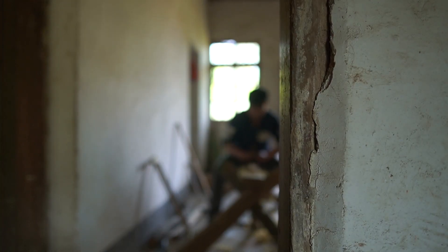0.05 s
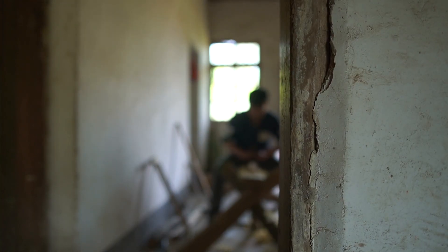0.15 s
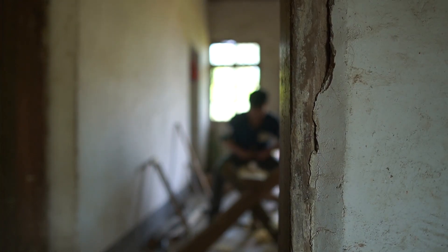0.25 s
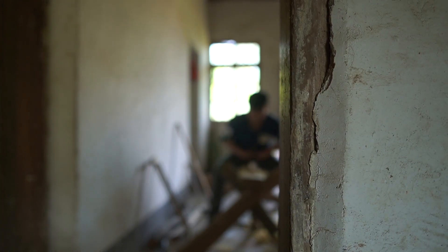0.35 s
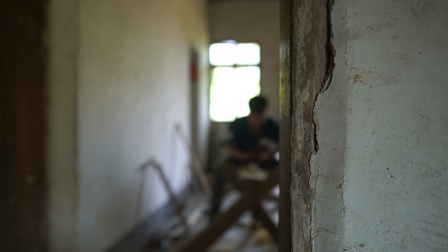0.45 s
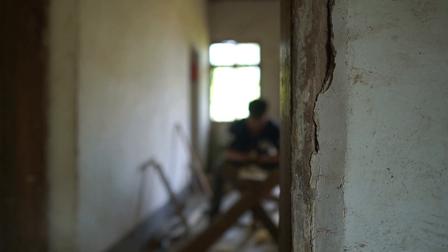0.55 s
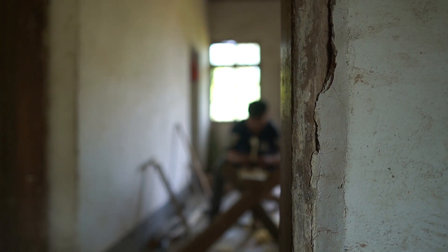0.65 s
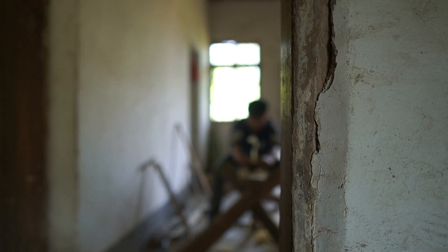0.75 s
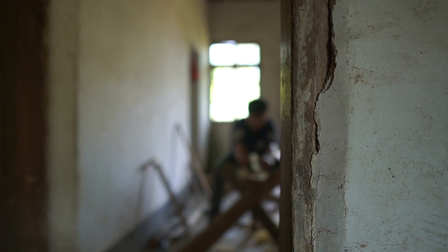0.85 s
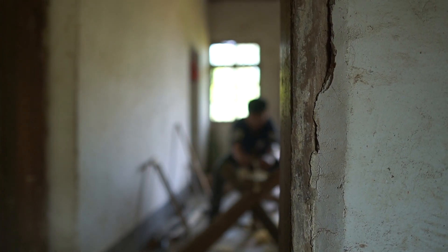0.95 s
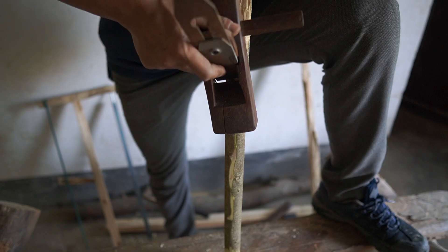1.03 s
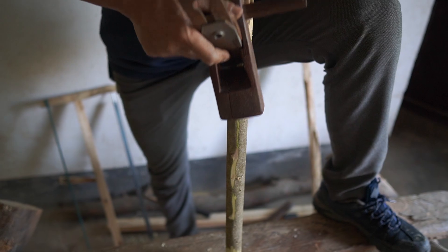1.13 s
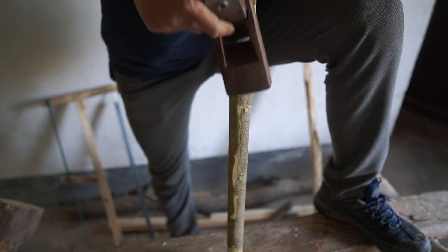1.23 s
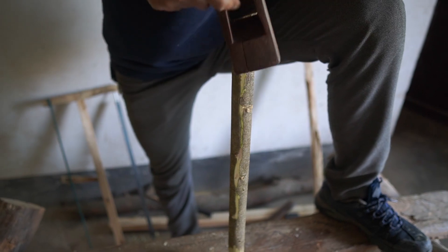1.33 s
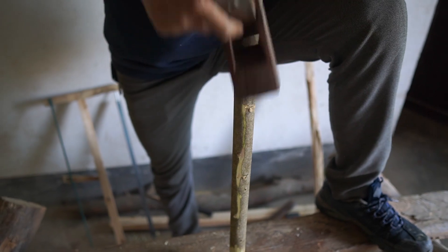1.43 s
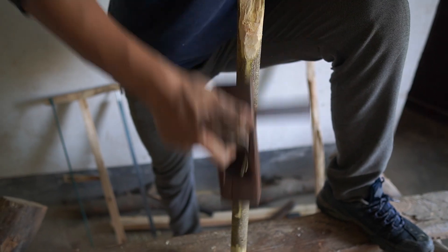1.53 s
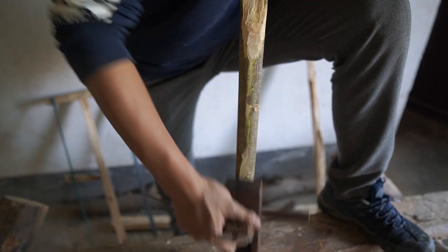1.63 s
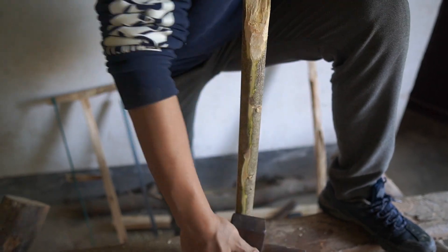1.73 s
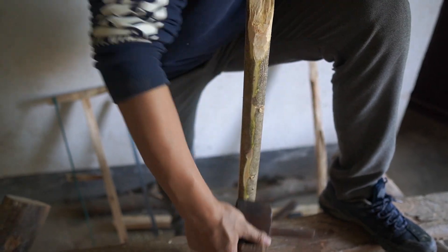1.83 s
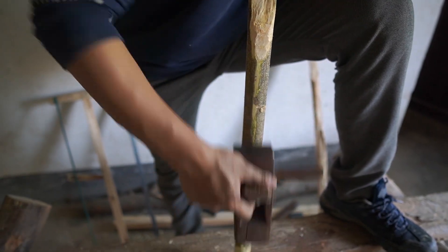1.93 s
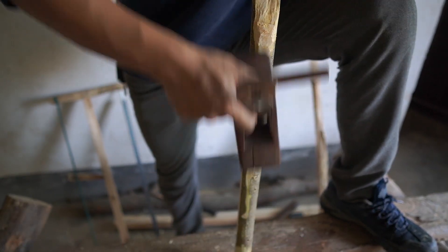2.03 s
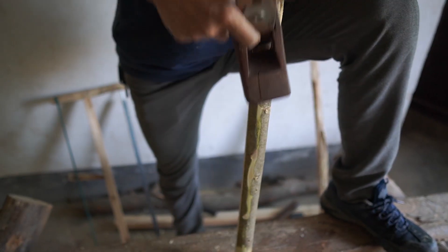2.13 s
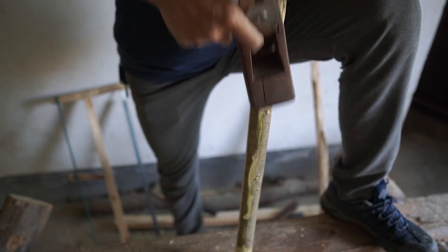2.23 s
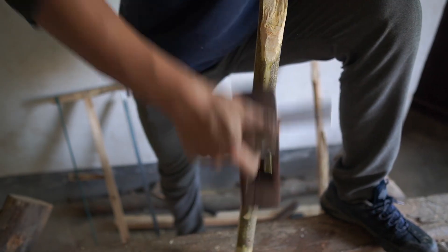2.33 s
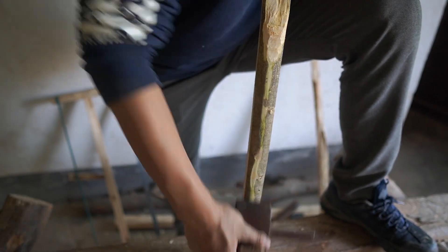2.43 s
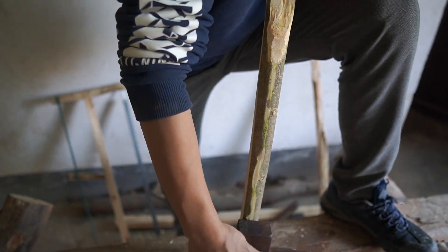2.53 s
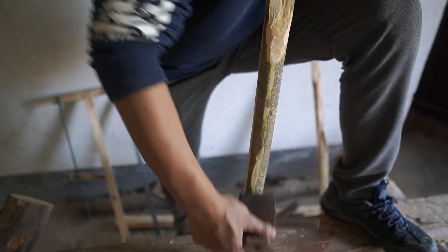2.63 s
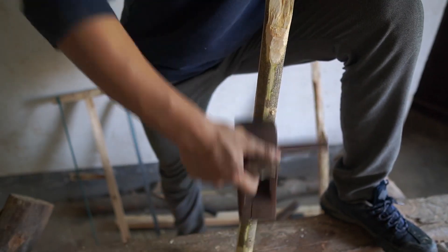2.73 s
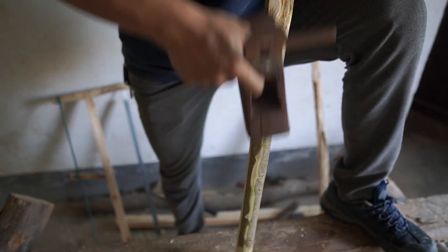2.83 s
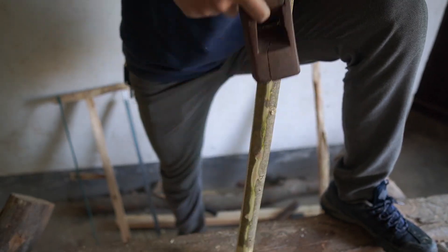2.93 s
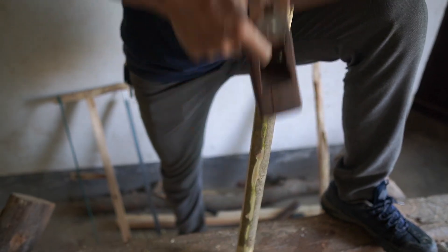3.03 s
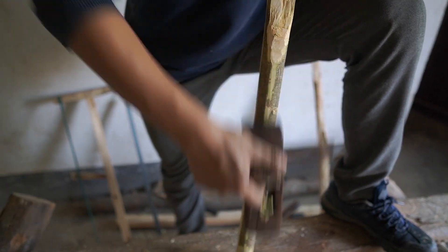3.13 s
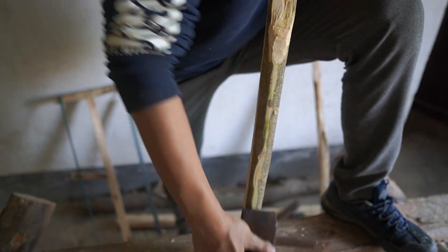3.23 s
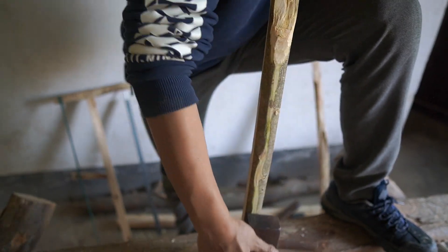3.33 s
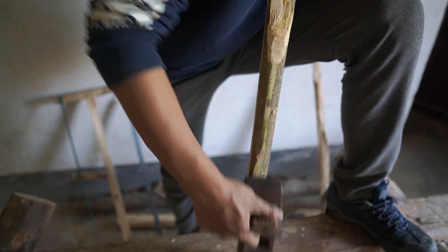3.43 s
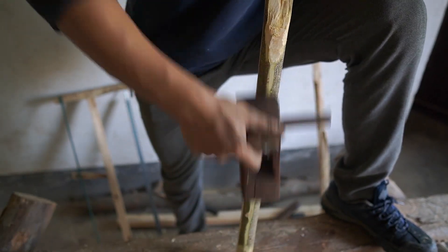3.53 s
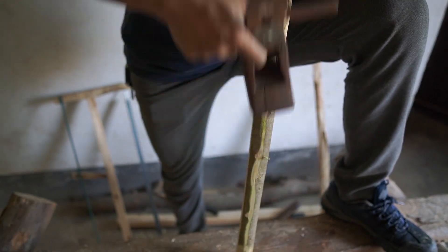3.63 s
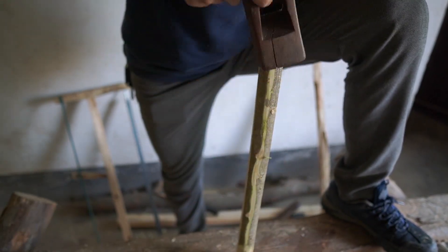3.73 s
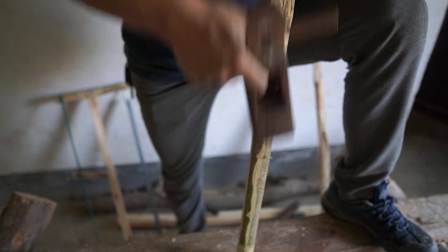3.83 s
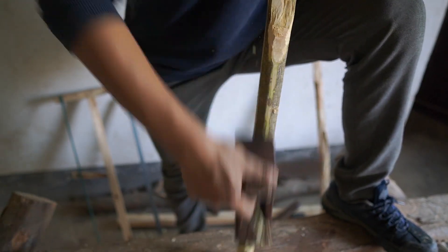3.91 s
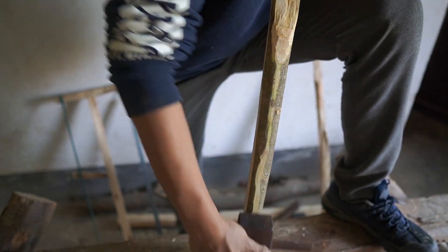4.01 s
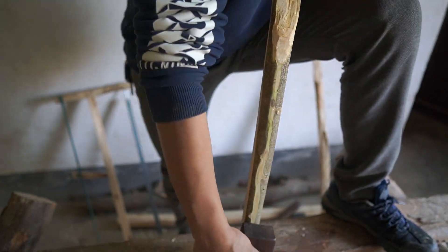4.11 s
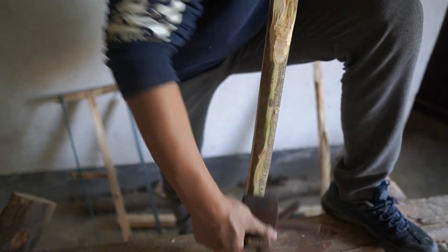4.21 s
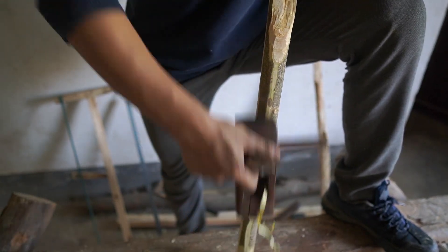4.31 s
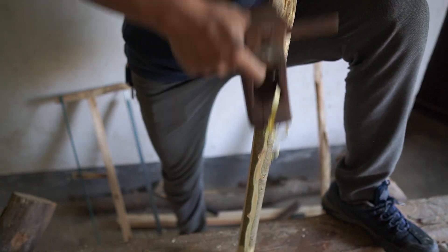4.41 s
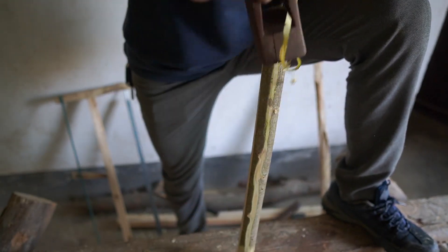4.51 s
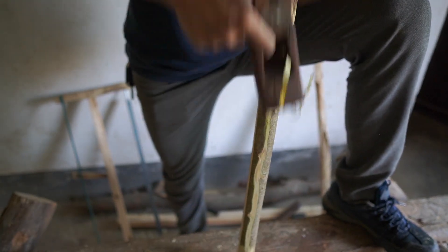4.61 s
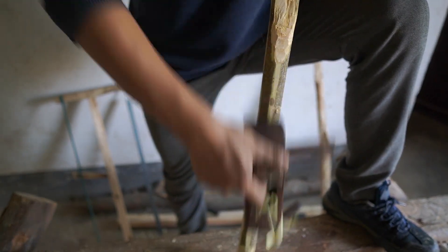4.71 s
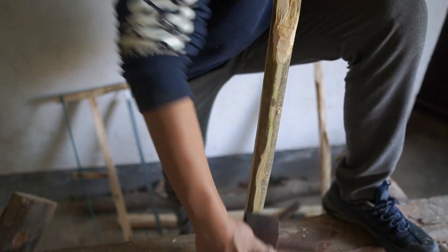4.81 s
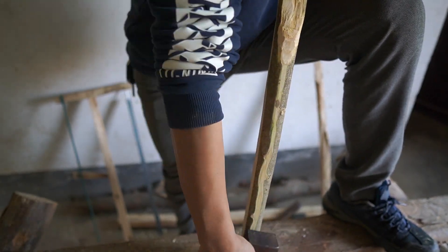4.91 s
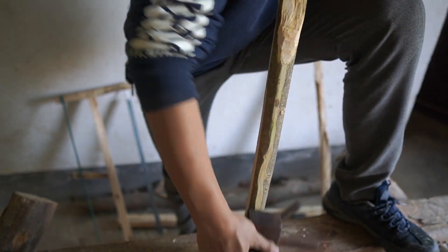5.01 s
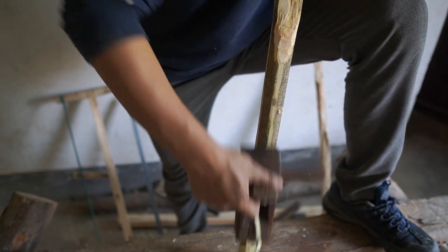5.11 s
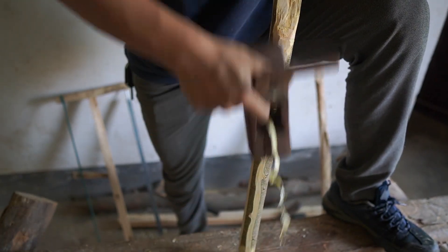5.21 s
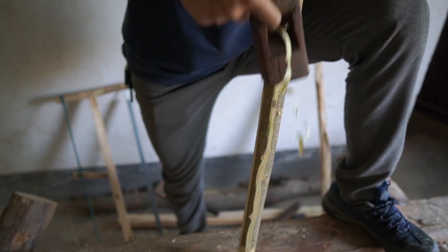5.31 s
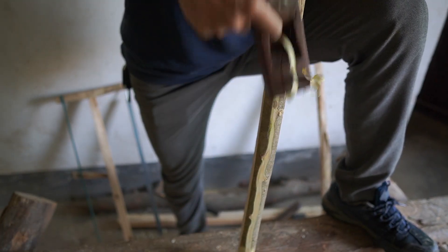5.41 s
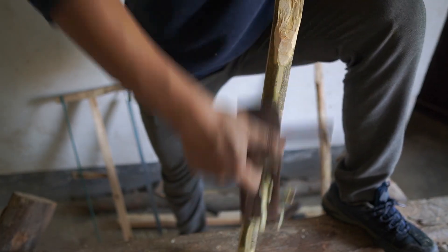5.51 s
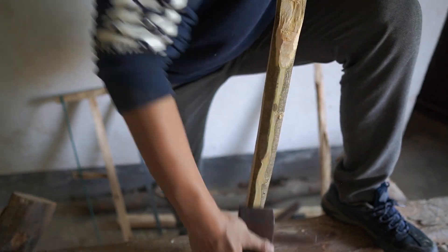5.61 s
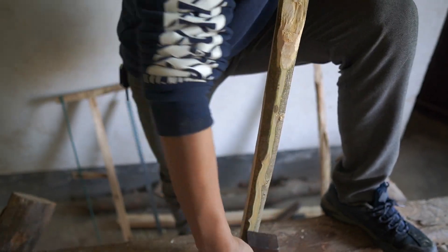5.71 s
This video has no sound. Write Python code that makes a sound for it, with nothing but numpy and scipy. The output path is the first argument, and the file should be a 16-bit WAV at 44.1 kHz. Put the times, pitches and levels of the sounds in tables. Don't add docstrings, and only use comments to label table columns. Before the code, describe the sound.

A wooden hand plane works along a green pole on a trestle in a bare, lightly echoing room. For the first 1.1 seconds it is heard from the doorway: a fading drag, faint rubs near 0.2 and 0.5, then a hard woody rasp at about 0.75 with a low ring after it. The sound cuts to close range, quiet at first. Tearing strokes of about 0.2 seconds follow at roughly 1.55, 2.35, 3.15, 3.95, 4.7 and 5.55, each a stuttering cluster of dry bites with bright steel hiss and brief squeaky resonances where grain catches. Between them come softer back-drags and wooden knocks, notably near 2.05, 2.8, 3.6, 4.4 and 4.9. The pole rumbles lightly, the trestle and floor give low muffled thuds as weight shifts, and cloth and shavings rustle faintly. It stops just after the last stroke, about 5.76 seconds.

```python
import sys
import numpy as np
from scipy import signal
from scipy.fft import rfft, irfft
from scipy.io import wavfile
from scipy.ndimage import uniform_filter1d

SR = 44100
rng = np.random.default_rng(int(sys.argv[2]) if len(sys.argv) > 2 else 0)


def unload_wav(signal):
    wavfile.write(
        sys.argv[1],
        SR,
        np.round(np.clip(np.atleast_2d(signal).T, -1, 1) * 32767).astype(np.int16),
    )


def ratio_of_db(decibels):
    return 10 ** (np.asarray(decibels, float) / 20)


N = 254016
CHANGE_S = 1.103
CHANGE = round(CHANGE_S * SR)
SIDES = np.array([[1], [-1]])

# start/s, length/s, first pressure/dB, last pressure/dB, keenness of iron/dB
BITES = [(1.549, 0.052, -24.5, -24.5, 8.5), (1.628, 0.063, -14.5, -28.5, 3.5),
         (1.676, 0.031, -37, -15.5, 5.5), (1.715, 0.05, -44, -25, -5), (2.348, 0.046, -23, -26, 8),
         (2.421, 0.036, -13.5, -23.5, 2.5), (2.459, 0.053, -22, -25.5, 5.5), (2.499, 0.018, -32, -24.5, 9),
         (3.13, 0.051, -21, -30, 10.5), (3.186, 0.051, -23.5, -19, 3), (3.236, 0.054, -32.5, -20.5, 8.5),
         (3.292, 0.027, -19, -22.5, 5), (3.934, 0.045, -22.5, -25.5, 9), (3.986, 0.039, -23, -22, 6.5),
         (4.028, 0.058, -17, -20.5, 1.5), (4.074, 0.036, -18, -24.5, -17), (4.713, 0.037, -26, -22.5, 11),
         (4.754, 0.046, -25, -23, 4.5), (4.805, 0.09, -20, -22.5, 2.5), (4.883, 0.024, -34, -22, -5),
         (5.541, 0.011, -32, -28, 8), (5.553, 0.042, -31, -22.5, 8), (5.6, 0.078, -21.5, -18.5, 1.5),
         (5.664, 0.053, -24, -20.5, -1), (5.72, 0.046, -26, -36, -3)]
DRAGS = [(1.15, 0.13, -47, -52, -6.5), (1.49, 0.061, -53, -34.5, -7), (1.951, 0.034, -27.5, -36.5, -20),
         (1.995, 0.024, -30.5, -39.5, -13.5), (2.165, 0.047, -55, -63, -1), (2.29, 0.039, -48.5, -44.5, -2),
         (2.713, 0.011, -27, -36, -14), (2.729, 0.014, -33, -34, -8.5), (2.757, 0.017, -36, -37, -7),
         (2.775, 0.021, -28.5, -29.5, -7), (3.06, 0.035, -61, -46, 9), (3.092, 0.045, -48, -28, -11),
         (3.489, 0.022, -28.5, -30.5, -8.5), (3.54, 0.028, -26.5, -25.5, -8), (3.84, 0.093, -49, -31, 0),
         (4.281, 0.016, -33, -26.5, -13), (4.403, 0.013, -46, -39, 5.5), (4.5, 0.062, -51, -47, -1),
         (4.644, 0.023, -37, -41.5, -6), (4.67, 0.038, -50, -34.5, -3), (4.93, 0.037, -37, -33.5, -13),
         (5.096, 0.032, -34, -31.5, -22), (5.189, 0.035, -26, -38, -3.5), (5.478, 0.046, -46, -37.5, -3)]
# attack/s, release/s, sole share/dB, sole per keenness/(dB/dB), keenness lost over contact/dB
BITE_TOUCH = (0.0013, 0.0029, 0.53, 0.1, 2.1)
DRAG_TOUCH = (.003, 0.0144, -0.3, 0.33, -0.2)
# t/s, peak level/dB, iron share/dB, pole share/dB
KNOCKS = [(1.149, -44, -11, -4), (2.0577, -16.5, -24, -10.5), (2.8246, -17.5, 2, -14.5),
          (3.092, -29, 14, -14), (3.601, -13, -4, -23), (3.8792, -25, 12, -32), (4.2903, -29, -31, -6),
          (4.383, -22, 6.5, -20), (4.4033, -13, -6.5, -20), (4.58, -31.5, -9, -3), (4.661, -37, 10, -15),
          (4.6845, -26, 10.5, -4), (4.937, -18.5, -22, -10.5), (5.0593, -42, 14, -23),
          (5.196, -21, -17, -29), (5.262, -48, -16, -1), (5.5047, -28.5, 15, -29)]
# t/s, level/dB, bright share/dB
STIRS = [(.2, -55, -5), (.95, -67, -21), (1.2, -55.5, -4), (1.802, -54, -3), (2.06, -42.5, -11.5),
         (2.6, -51.5, -3), (2.83, -43, -9), (3.38, -42, -13), (3.61, -41, -6), (3.8, -51.5, -19),
         (4.15, -51, -7), (4.42, -46, -7.5), (4.46, -54, -6), (5.07, -47.5, 0), (5.21, -41.5, -9),
         (5.33, -47, -5)]
STIR_RISE_S, STIR_FALL_S, AIR_REST_DB, BRIGHT_REST_DB = 0.018, 0.15, -56.5, -58.5
HANDLING_DB = (-6.5, -12.5, -9.5)
# f/Hz, width/Hz, level/dB
BODY = [(1642, 272, -2), (1762, 98, 1.5), (1836, 62, 0), (1936, 98, 3), (2245, 290, -6.5)]
SOLE = [(2420, 610, -11.5), (2750, 77, 5), (3050, 420, -3.5), (3336, 400, -5.5), (3802, 150, -2),
        (4446, 62, -9)]
IRON = [(5176, 94, -4), (5520, 84, -18), (6230, 700, -5), (5460, 4000, -13), (6806, 144, -6),
        (7090, 760, -15), (8870, 140, -4), (9400, 750, -11.5), (11600, 2100, -16), (12100, 220, -6.5),
        (12740, 250, -13.5), (15060, 1000, -18)]


def close_plane():
    drives = tearing(contact(BITES, BITE_TOUCH), 8000, spread_db=1.9, judder_db=3.1)
    stir_s, stir_db, _ = np.transpose(STIRS)
    stir = swells(stir_s, stir_db, STIR_RISE_S, STIR_FALL_S, AIR_REST_DB)
    handling = stir * ratio_of_db(np.array(HANDLING_DB))[:, None] * (np.arange(N) > CHANGE)
    drags = contact(DRAGS, DRAG_TOUCH)
    drives += tearing(drags + handling, 4000, spread_db=3.5, judder_db=2.0)
    _, peak_db, iron_db, _ = np.transpose(KNOCKS)
    knock_levels_db = (peak_db + 2, peak_db - 0.5, peak_db + iron_db - 8.0)
    knocks = np.array([strikes(db, 0.0017) for db in knock_levels_db])
    crack = bandpass(strikes(peak_db + 1.5, 0.0012), 1, 1500, 5500)
    return plane(drives + knocks, (BODY, SOLE, IRON)) + crack


# start/s, length/s, first pressure/dB, last pressure/dB, keenness/dB
FAR_CONTACTS = [
    (0.0, 0.13, -37, -46.5, -8.5),
    (.15, 0.056, -65, -45.5, 2.5),
    (.215, 0.064, -44.5, -43.5, -6),
    (.472, 0.017, -34.5, -30, -7),
    (.494, 0.2, -33.5, -32.5, -4),
    (.6, 0.12, -51, -24.5, 5),
    (.735, 0.0093, -19, -9.5, -5),
    (.76, 0.068, -11, -18, -22.5),
    (.845, 0.032, -21, -26.5, -33),
]
# attack/s, release/s, sole share/dB, sole per keenness/(dB/dB), keenness lost over contact/dB
FAR_TOUCH = (0.00055, 0.013, 0.53, 0.49, 1.4)
# f/Hz, width/Hz, level/dB
FAR_BODY = [(1320, 270, -5.5), (1612, 94, 5), (1810, 98, 3), (2023, 67, 4), (2280, 150, -2)]
FAR_IRON = [(4960, 870, -6.5), (6440, 380, -5), (7110, 230, -2), (8100, 2000, -11.5), (9330, 890, -6.5),
            (12160, 1100, -12), (15100, 1900, -16)]


def far_plane():
    drives = tearing(contact(FAR_CONTACTS, FAR_TOUCH), 5000, spread_db=0.5, judder_db=0.3)
    return plane(drives[:, :CHANGE], (FAR_BODY, SOLE, FAR_IRON))


def plane(drives, bodies):
    parts = [resonate(d, m, patchy_db=2.4, spread_db=0.9) / power_gain(m) for d, m in zip(drives, bodies)]
    return highpass(sum(parts), 2, 1150)


def contact(rows, touch):
    attack_s, release_s, sole_db, sole_follows, dulling_db = touch
    out = np.zeros((3, N))
    for start, length, first_db, last_db, keen_db in rows:
        end = round((start + length + 10 * release_s) * SR)
        part = out[:, max(round(start * SR), 0):end]
        age = np.arange(part.shape[1]) / SR
        along = np.clip(age / length, 0, 1)
        gate = np.clip(age / attack_s, 0, 1) * np.exp(-np.maximum(age - length, 0) / release_s)
        iron_db = keen_db + dulling_db * (0.5 - along)
        shares_db = np.array([0 * along, sole_db + sole_follows * iron_db, iron_db])
        part += gate * ratio_of_db(first_db + (last_db - first_db) * along + shares_db)
    return out


def tearing(gains, per_s, spread_db, judder_db):
    tear = fibres(per_s, spread_db, judder_db)
    hissing = rms_one(tear + 2.07 * rng.standard_normal(N))
    return gains * np.array([tear, tear, hissing])


def fibres(per_s, spread_db, judder_db):
    strength_db = spread_db * np.minimum(rng.exponential(1, N), 5)
    sizes = ratio_of_db(strength_db) * rng.choice([-1, 1], N)
    torn = rng.random(N) < per_s / SR
    return rms_one(sizes * torn * ratio_of_db(judder_db * drift(85)))


def strikes(level_db, length_s):
    out = np.zeros(N)
    out[[round(row[0] * SR) for row in KNOCKS]] = ratio_of_db(level_db)
    decay = signal.lfilter([1], [1, -np.exp(-1 / (length_s * SR))], out + 1e-18)
    return decay * rng.choice([-1, 1], N)


# middle/s, length/s, f/Hz, level/dB rms
WOOD_FLARES = [(0.738, 0.022, 2760, -18), (0.75, 0.017, 2500, -12), (0.755, 0.021, 1950, -9),
               (0.763, 0.014, 1770, -5.5), (0.783, 0.013, 2280, -14), (0.796, 0.016, 2280, -16),
               (0.802, 0.0097, 1820, -17), (0.822, 0.0087, 1600, -12.5), (0.865, 0.0093, 1770, -10),
               (1.635, 0.012, 1710, -14), (1.64, 0.028, 2750, -21.5), (1.707, 0.01, 2050, -18),
               (1.711, 0.0093, 1680, -15.5), (2.06, 0.0074, 2720, -21.5), (2.361, 0.014, 1680, -19),
               (2.43, 0.01, 2790, -15), (2.449, 0.0097, 1880, -25), (2.488, 0.012, 2780, -9),
               (2.491, 0.0069, 1930, -14), (2.509, 0.047, 3800, -20), (2.515, 0.013, 2746, -9.5),
               (2.735, 0.017, 1840, -25.5), (3.132, 0.007, 1660, -21), (3.228, 0.021, 1810, -22),
               (3.289, 0.013, 2820, -14), (3.302, 0.011, 3060, -14), (3.556, 0.014, 1940, -24.5),
               (3.604, 0.0082, 1860, -31), (3.604, 0.0076, 2750, -16.5), (4.053, 0.016, 1810, -23),
               (4.069, 0.013, 1810, -12), (4.086, 0.011, 1870, -15), (4.294, 0.009, 1810, -22.5),
               (4.406, 0.0081, 2800, -18.5), (4.718, 0.0092, 1650, -23.5), (4.731, 0.014, 1730, -18.5),
               (4.865, 0.015, 3850, -19), (4.866, 0.013, 2820, -15), (4.881, 0.014, 2750, -13),
               (4.888, 0.01, 1830, -13.5), (4.902, 0.014, 2810, -18), (5.619, 0.013, 1810, -16),
               (5.659, 0.016, 1810, -15.5), (5.711, 0.013, 2770, -12.5)]
IRON_FLARES = [(1.558, 0.012, 9090, -21), (1.567, 0.017, 6010, -12), (1.578, 0.019, 12060, -19),
               (1.58, 0.015, 8960, -18), (1.588, 0.013, 5960, -17), (1.63, 0.0061, 6960, -12),
               (1.631, 0.0091, 5020, -32), (1.639, 0.023, 8850, -27), (1.672, 0.013, 12660, -20),
               (2.359, 0.012, 6030, -17), (2.361, 0.021, 8890, -19), (2.373, 0.0094, 6030, -18),
               (2.384, 0.03, 12060, -21.5), (2.425, 0.012, 8870, -13.5), (2.468, 0.02, 8850, -16),
               (3.137, 0.014, 8980, -17.5), (3.191, 0.011, 8870, -12.5), (3.22, 0.011, 5210, -21),
               (3.235, 0.02, 8870, -25), (3.237, 0.009, 5190, -15), (3.274, 0.011, 8870, -18),
               (3.274, 0.018, 5150, -23), (3.3, 0.027, 8890, -21), (3.962, 0.0076, 11990, -11),
               (3.971, 0.018, 8870, -17), (4.718, 0.01, 6720, -19), (4.721, 0.012, 7280, -27),
               (4.743, 0.016, 9020, -15), (4.744, 0.0091, 5150, -26), (4.747, 0.01, 5960, -14),
               (4.763, 0.011, 8890, -12), (4.771, 0.036, 8890, -20), (4.818, 0.021, 8870, -26),
               (4.855, 0.014, 8910, -20), (4.882, 0.011, 8940, -22), (5.576, 0.012, 9110, -17),
               (5.586, 0.023, 12100, -18), (5.606, 0.023, 8940, -19)]
LIGHT_FLARES = [(0.505, 0.024, 1810, -27.5), (0.523, 0.0079, 1740, -31), (0.661, 0.017, 2730, -26),
                (0.708, 0.011, 2700, -24), (1.743, 0.011, 2840, -27), (2.06, 0.0078, 2150, -25),
                (2.564, 0.03, 2750, -26.5), (2.738, 0.027, 2800, -29.5), (2.786, 0.01, 2920, -26),
                (3.508, 0.015, 1750, -36), (3.549, 0.017, 2850, -28), (3.603, 0.0072, 2300, -21.5),
                (3.604, 0.0092, 6970, -29), (3.88, 0.0033, 9500, -25), (3.881, 0.0069, 6740, -35),
                (3.881, 0.005, 8400, -32), (4.295, 0.0087, 2880, -27), (4.406, 0.0089, 3200, -32),
                (4.406, 0.007, 6530, -28.5), (4.65, 0.012, 1575, -35), (4.406, 0.011, 4520, -38),
                (4.407, 0.011, 5100, -36), (5.103, 0.016, 2750, -31.5), (5.106, 0.015, 1880, -32),
                (5.121, 0.0089, 2970, -32.5), (5.199, 0.023, 1920, -39)]


def grain_catches():
    wood = flares(WOOD_FLARES, lift_db=1.0, lean_db=-1.5)
    iron = flares(IRON_FLARES, lift_db=0.5, lean_db=0.0, flutter_db=4.0)
    return wood + iron + flares(LIGHT_FLARES, lift_db=3.5, lean_db=1.5)


# middle/s, length/s, f/Hz, level/dB rms
THUMPS = [(0.795, 0.039, 720, -29), (0.801, 0.03, 1130, -29), (0.809, 0.057, 713, -34.5),
          (0.816, 0.041, 1162, -27), (0.823, 0.027, 560, -36), (0.825, 0.025, 370, -36),
          (0.862, 0.02, 565, -33), (0.885, 0.052, 1157, -35.5), (0.92, 0.21, 586.6, -49),
          (1.151, 0.005, 950, -46), (1.55, 0.018, 1090, -37), (1.551, 0.011, 750, -35),
          (1.552, 0.012, 270, -40), (2.07, 0.039, 605, -36.5), (2.071, 0.05, 1020, -38),
          (2.107, 0.033, 590, -40), (3.618, 0.034, 1026, -39), (3.939, 0.038, 1090, -40.5),
          (4.307, 0.019, 1070, -37), (4.414, 0.022, 590, -43), (4.813, 0.022, 630, -37),
          (4.96, 0.029, 191, -38), (4.968, 0.033, 410, -39), (4.986, 0.045, 182, -40),
          (5.018, 0.032, 418.2, -40), (5.267, 0.012, 590, -36)]


def thumps():
    return flares(THUMPS, lift_db=4.0, lean_db=0.6)


def flares(rows, lift_db, lean_db, flutter_db=1.5):
    out = np.zeros((2, N + SR))
    chances = rng.uniform(-0.86, 1, (len(rows), 2))
    for (middle, length, hz, level_db), (turn, lean) in zip(rows, chances):
        age = np.arange(-round(2 * length * SR), round(3.0 * length * SR)) / SR
        width_s = length * np.where(age < 0, 0.34, 0.45)
        shape = np.exp(-(age / width_s) ** 2)
        tone = shape * np.sin(2 * np.pi * hz * age + np.pi * turn) * ratio_of_db(level_db + lift_db)
        first = round((middle + age[0]) * SR)
        out[:, first:first + len(age)] += tone * ratio_of_db(lean_db * lean * SIDES)
    return out[:, :N] * drift(220, flutter_db)


# t/s, level/dB
JOLTS = [(.775, -31), (.815, -31.5), (2.058, -33), (3.601, -37), (4.295, -43), (4.403, -35), (4.93, -39),
         (1.54, -38.5), (2.84, -40.5), (2.93, -44), (3.8, -42), (4.65, -41.5), (5.25, -39)]
# f/Hz, width/Hz, level/dB
POLE = [(442, 99, -3), (532, 21.4, 1.5), (590, 29.5, 0), (704, 65, -0.5), (824, 90, -1), (1053, 39, 3),
        (1195, 54, -0.5)]


def pole():
    lag_s, follows_db, far_db = 0.028, -21, 5.5
    pressure = contact(BITES, BITE_TOUCH)[0] + contact(DRAGS, DRAG_TOUCH)[0]
    pressure += ratio_of_db(far_db) * contact(FAR_CONTACTS, FAR_TOUCH)[1]
    r = np.exp(-1 / (lag_s * SR))
    load = swells(*np.transpose(JOLTS), 0.0055, 0.07, (-55, -53.5, -55.5, -50))
    load = load + ratio_of_db(follows_db) * signal.lfilter([1 - r], [1, -r], pressure)
    _, peak_db, _, pole_db = np.transpose(KNOCKS)
    knocks = strikes(peak_db + pole_db - 1.5, 0.0056)
    rub = fibres(4000, spread_db=0.5, judder_db=1.5)
    ring = resonate(rub * load + knocks, POLE, patchy_db=2.0, spread_db=4.0) / power_gain(POLE)
    return bandpass(ring, 3, 210, 1600)


# start/s, length/s, f/Hz, width/Hz, level/dB
HELD = [
    (0, .2, 1070, 65, -43.5),
    (.53, .2, 880, 200, -46),
    (.472, .26, 1803, 100, -36.5),
    (.49, .25, 2790, 75, -36.5),
]
RUNG = [
    (.2, 0.33, 1072, 17, -49),
    (.215, 0.18, 2260, 41, -44.5),
    (.225, 0.14, 2780, 50, -41.5),
    (.84, 0.161, 590.3, 10.7, -31),
    (2.58, 0.11, 2720, 29, -36),
]


def pole_tones():
    return singing(HELD, fade_db=-1) + singing(RUNG, fade_db=17)


def singing(rows, fade_db):
    out = np.zeros(N)
    for start, length, hz, width, level_db in rows:
        age = np.arange(round(length * SR)) / SR
        first = max(round(start * SR), 0)
        gate = np.clip(age / 0.0012, 0, 1) * np.clip((length - age) / 0.0066, 0, 1)
        tone = one_mode(hz, width, size=SR // 2)[-len(age):]
        out[first:first + len(age)] += gate * ratio_of_db(level_db - fade_db * age / length) * tone
    return out


# t/s, trestle level/dB, floor beam share/dB
SHIFTS = [(.5, -56.5, -13), (.66, -50, -28), (.79, -44, -16.5), (.9, -60, -7), (1.29, -54, -22),
          (1.529, -44, -30), (1.66, -45.5, -16), (2.05, -41, -20), (2.13, -51, -3), (2.38, -44, -20),
          (2.47, -48, -5), (2.638, -81, 16), (2.82, -48, -17), (2.94, -46, -17), (3.07, -56, -20),
          (3.21, -48, -7), (3.62, -48.5, -11), (3.71, -52, -4), (3.9, -44.5, -16), (4.09, -55, -13),
          (4.29, -49, -28), (4.43, -43.5, -19), (4.65, -38, -24), (4.8, -40.5, -13), (4.93, -44.5, -27),
          (5.04, -44, -10.5), (5.25, -57, -10), (5.6, -41, -12)]
# f/Hz, width/Hz, level/dB
TRESTLE = [(117, 16, -10.5), (183.7, 11.5, 0.5), (199, 17.5, -11), (266.5, 35, 0)]
# f/Hz, width/Hz
BEAM = (84, 7.7)


def trestle_and_floor():
    s, weight_db, beam_db = np.transpose(SHIFTS)
    rise_s, trestle_fall_s, beam_fall_s = 0.028, 0.069, 0.086
    weight = swells(s, weight_db + 1.5, rise_s, trestle_fall_s, (-74, -75, -64, -53))
    sag = swells(s, weight_db + beam_db + 4.0, rise_s, beam_fall_s, (-98, -105, -89, -60))
    rub = fibres(4000, spread_db=0.5, judder_db=1.5)
    ring = resonate(rub * weight, TRESTLE, patchy_db=2.0, spread_db=6.0) / power_gain(TRESTLE)
    return bandpass(ring, 2, 105, 400) + sag * one_mode(*BEAM)


# f/Hz, level/dB per Hz
AIR_COLOUR = [(590, -18), (1000, -11), (1650, 5), (3840, 5.5), (5570, -1.5), (6860, -7), (12400, -12),
              (16000, -15.5)]


def air(side_db):
    hz = np.maximum(np.fft.rfftfreq(N, 1 / SR), 20)
    colour_hz, colour_db = np.transpose(AIR_COLOUR)
    colour = ratio_of_db(np.interp(np.log(hz), np.log(colour_hz), colour_db))
    bright = 1 / (1 + (4600 / hz) ** 4)
    s, stir_db, bright_db = np.transpose(STIRS)
    dull_level = swells(s, stir_db + 0.8, STIR_RISE_S, STIR_FALL_S, AIR_REST_DB)
    bright_level = swells(s, stir_db + bright_db + 4.5, STIR_RISE_S, STIR_FALL_S, BRIGHT_REST_DB)
    patches = np.log(np.geomspace(700, 14000, 10))
    out = 0
    for level, share in ((dull_level, 1 - bright), (bright_level, bright)):
        noise = rfft(rng.standard_normal((2, N)))
        hiss = rfft(rms_one(irfft(noise * colour * share, N)))
        rustle = 0
        for own in np.eye(len(patches)):
            band = irfft(hiss * np.interp(np.log(hz), patches, own), N)
            rustle = rustle + drift(7, 3.5) * band
        mid, side = rustle
        out = out + level * drift(9, 1.2) * (mid + ratio_of_db(side_db) * side * SIDES)
    return out


# f/Hz, t60/s
ROOM = [(200, 0.24), (1000, 0.58), (3000, 0.37), (8000, 0.34), (15000, 0.2)]


def room(x, alike):
    t = np.arange(int(0.7 * SR)) / SR
    room_hz, room_t60 = np.transpose(ROOM)
    edges = 60 * 2 ** np.arange(0, 8.6, 1.0)
    echo = 0
    for low, high in zip(edges, edges[1:]):
        t60 = np.interp(np.log(2.13 * low), np.log(room_hz), room_t60)
        band = bandpass(rng.standard_normal((2, len(t))), 2, low, high)
        echo = echo + band * ratio_of_db(-60 * t / t60)
    echo = echo * np.clip(t / 0.013, 0, 1)
    share = np.clip(alike, 0, 0.99)
    echo = np.sqrt(1 + share) * echo[0] + np.sqrt(1 - share) * echo[1] * SIDES
    echo = echo / np.sqrt(np.sum(echo ** 2) / 2)
    return signal.fftconvolve(x.mean(axis=0)[None], echo, axes=1)[:, :x.shape[1]]


def resonate(x, modes, patchy_db, spread_db):
    out = np.zeros((2, len(x)))
    for k, (hz, width, level_db) in enumerate(modes):
        r = np.exp(-np.pi * width / SR)
        drive = x * drift(29.5, patchy_db, size=len(x)) * ((-1) ** k * ratio_of_db(level_db)) + 1e-18
        poles = [1, -2 * r * np.cos(2 * np.pi * hz / SR), r * r]
        ring = signal.lfilter([1 - r * r, 0, r * r - 1], poles, drive)
        lean = drift(3.8, spread_db, size=len(x))
        out[0] += ring * lean
        out[1] += ring / lean
    return out


def power_gain(modes):
    _, width, level_db = np.transpose(modes)
    return np.sqrt(np.sum(ratio_of_db(level_db) ** 2 * width) * 4 * np.pi / SR)


def one_mode(hz, width, size=N):
    r = np.exp(-np.pi * width / SR)
    tone = rng.standard_normal(size)
    for again in range(2):
        tone = signal.lfilter([1, 0, -1], [1, -2 * r * np.cos(2 * np.pi * hz / SR), r * r], tone)
    slow = uniform_filter1d(tone ** 2, size=round(SR / width))
    return rms_one(tone / np.sqrt(slow + 0.38 * np.mean(tone ** 2)))


REST_S = (0, 1.3, 2.0, 5.76)


def swells(times, levels_db, rise_s, fall_s, rest_db):
    t = np.arange(0, N + 64, 64) / SR
    age = np.maximum(t - np.array(times)[:, None], 0)
    shape = (1 - np.exp(-age / rise_s)) * np.exp(-age / fall_s) * ratio_of_db(levels_db)[:, None]
    rest = ratio_of_db(np.interp(t, REST_S, np.zeros(4) + rest_db))
    return np.interp(np.arange(N) / SR, t, np.sqrt(np.sum(shape ** 2, axis=0) + rest ** 2))


def drift(rate_hz, spread_db=None, size=N):
    r = np.exp(-64 * np.pi * rate_hz / SR)
    noise = rng.standard_normal(size // 32 + 1002)
    slow = rms_one(signal.lfilter([1], [1, -2 * r, r * r], noise)[1000:])
    values = slow if spread_db is None else ratio_of_db(spread_db * slow)
    return np.interp(np.arange(size) / 32, np.arange(len(slow)), values)


def rms_one(x):
    return x / np.sqrt(np.mean(x ** 2) + 1e-20)


def bandpass(x, order, low_hz, high_hz):
    return signal.sosfilt(signal.butter(order, [low_hz, high_hz], "band", fs=SR, output="sos"), x)


def highpass(x, order, hz):
    return signal.sosfilt(signal.butter(order, hz, "high", fs=SR, output="sos"), x)


def scene():
    near = close_plane()
    work = ratio_of_db(-0.05) * near + ratio_of_db(-7.0) * room(near, alike=0.55)
    far = far_plane()
    work[:, :CHANGE] += ratio_of_db(-1.9) * far + ratio_of_db(-5.5) * room(far, alike=0.74)
    work += grain_catches() + thumps()
    rest = pole() + pole_tones() + trestle_and_floor() + air(side_db=-6)
    t = np.arange(N) / SR - CHANGE_S
    fade_in = np.where(t < 0, 1, np.clip(0.08 + t / 0.036, 0, 1))
    return (work + rest) * fade_in


def limiter(pair, knee_db, speed_s):
    r = np.exp(-1 / (speed_s * SR))
    power = signal.lfilter([1 - r], [1, -r], np.mean(pair ** 2, axis=0))
    return pair / (1 + (power / ratio_of_db(knee_db) ** 2) ** 2) ** 0.14


def band_limit(x):
    return signal.sosfilt(signal.butter(12, 17000, fs=SR, output="sos"), x)


def record(dry):
    mid, side = (dry[0] + dry[1]) / 2, (dry[0] - dry[1]) / 2
    shaded = mid * drift(75)
    side += ratio_of_db(-6.5) * highpass(shaded, 1, 4000)
    side += mid * np.where(np.arange(N) < CHANGE_S * SR, 0.07, -0.11)
    side -= 0.16 * highpass(mid, 2, 10500)
    side = highpass(side, 3, 560)
    pair = limiter(np.array([mid + side, mid - side]), knee_db=-15.5, speed_s=0.003)
    pair = 0.76 * np.tanh(pair / 0.81)
    pair = highpass(pair, 2, 70)
    mix = signal.sosfilt(signal.ellip(10, 0.5, 42, 15750, fs=SR, output="sos"), pair)
    return band_limit(mix)


dry = scene()
out = record(dry)
unload_wav(out)
```